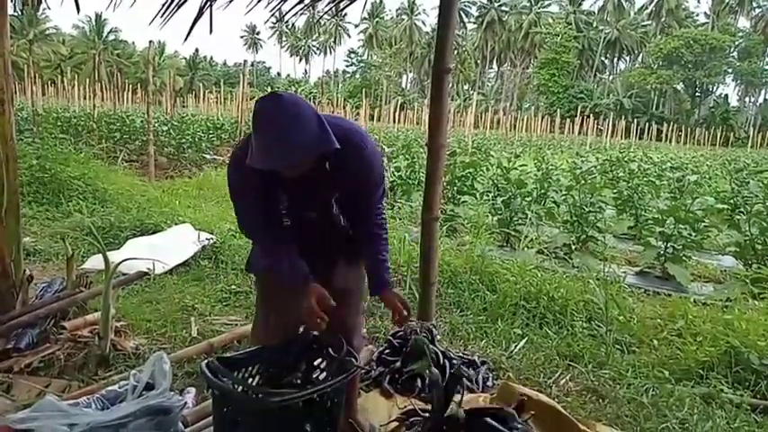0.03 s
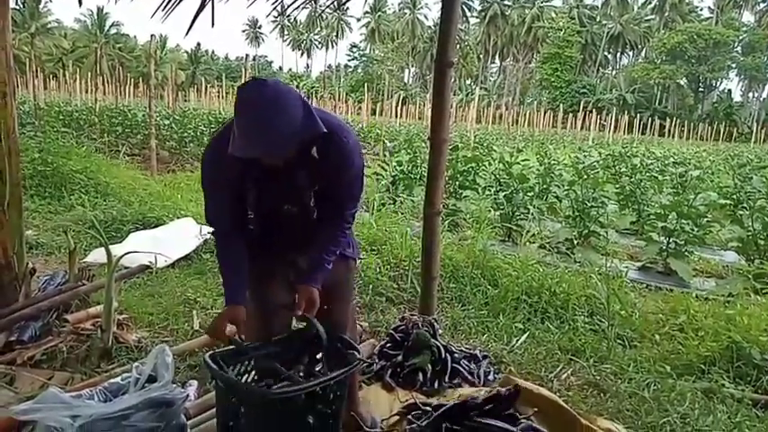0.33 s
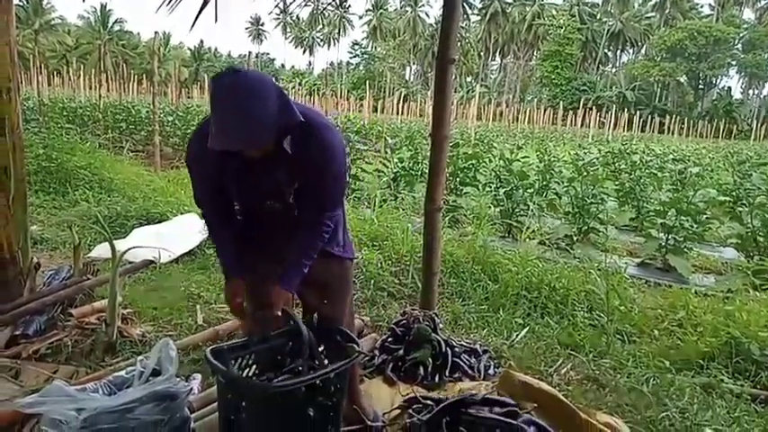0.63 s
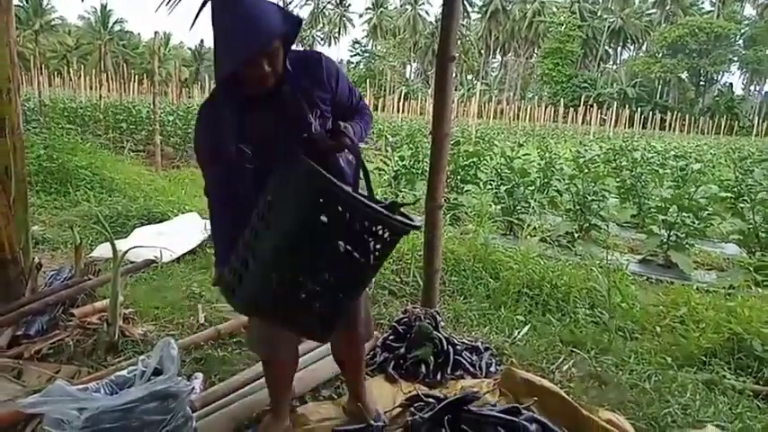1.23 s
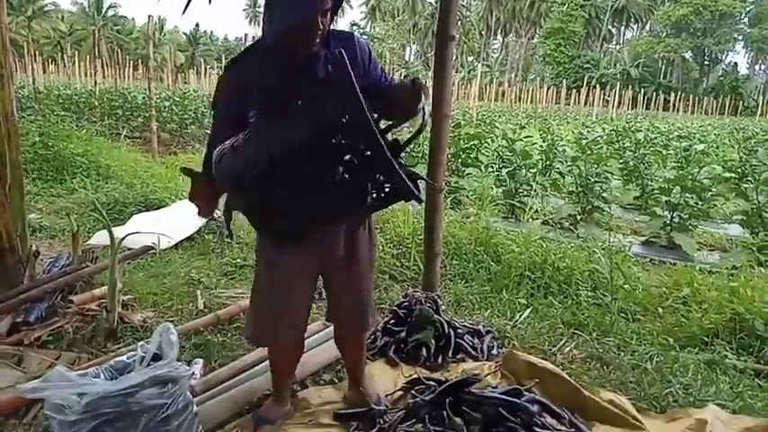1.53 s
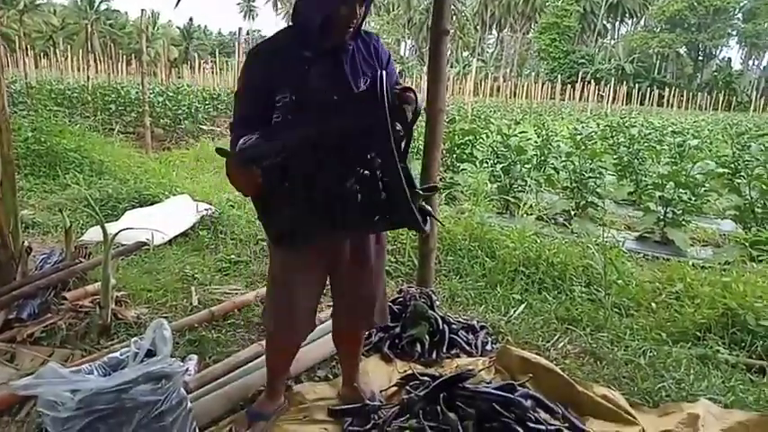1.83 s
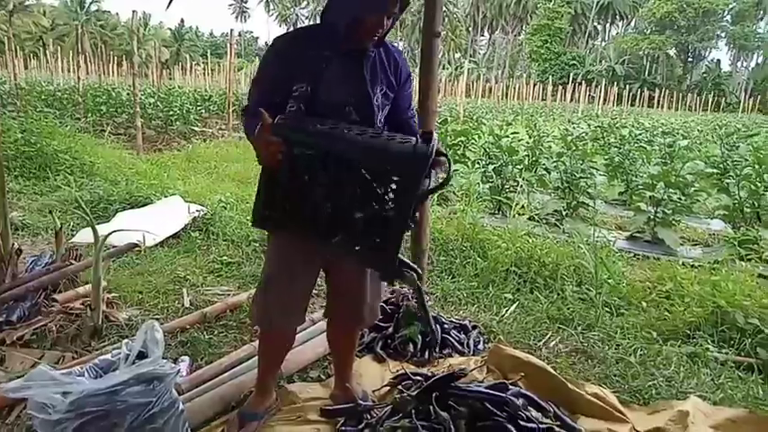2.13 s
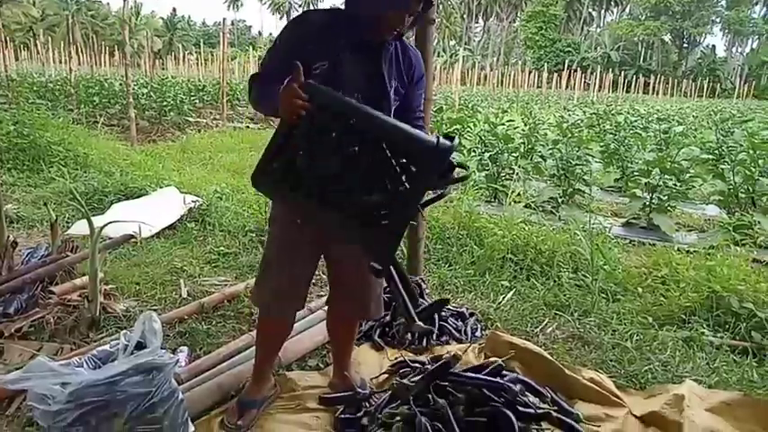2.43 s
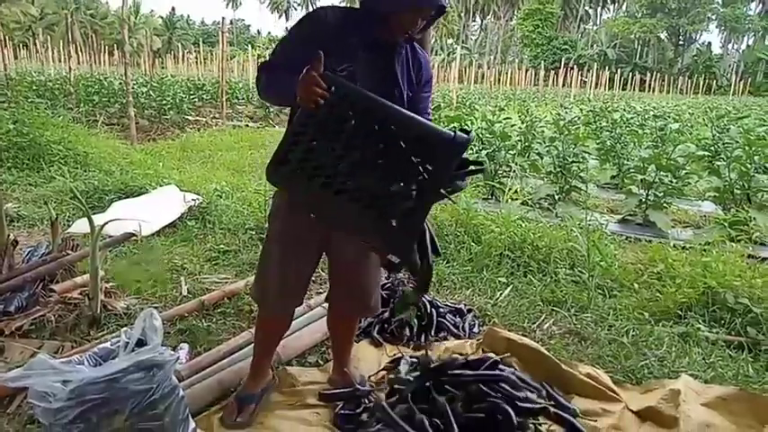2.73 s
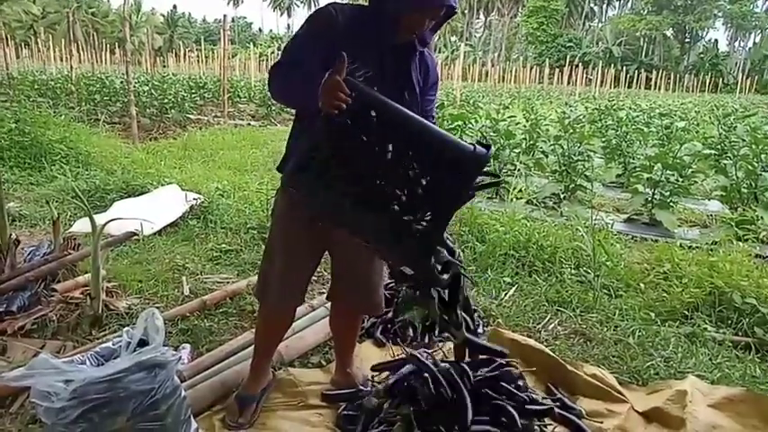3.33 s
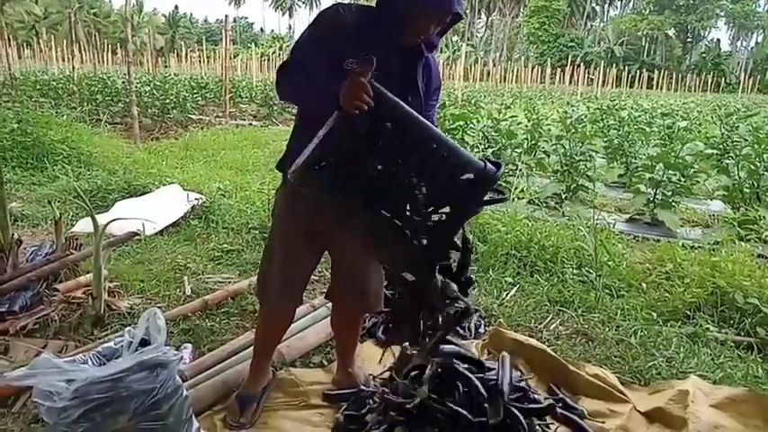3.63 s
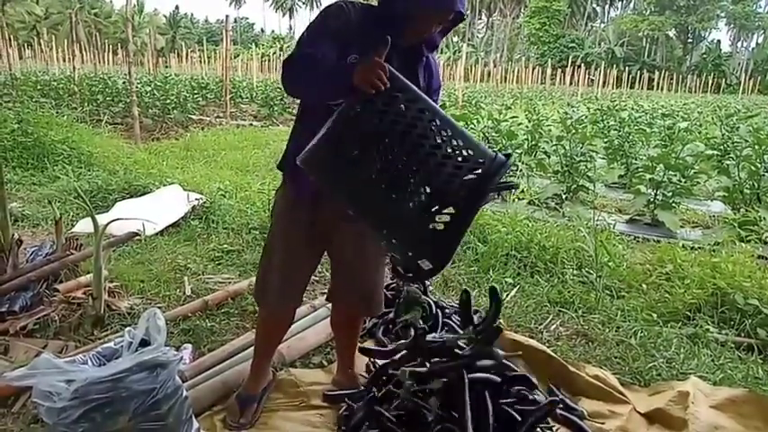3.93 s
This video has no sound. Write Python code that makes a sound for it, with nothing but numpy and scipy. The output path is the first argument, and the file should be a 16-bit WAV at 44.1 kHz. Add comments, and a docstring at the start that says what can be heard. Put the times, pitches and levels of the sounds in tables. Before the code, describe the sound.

Eggplants knock and rustle into a plastic crate during the first second, close and slightly muffled. At about 1.2 seconds the crate is lifted with a thump and a tiny handle squeak, and the load knocks again near 1.6. From 2.3 seconds the vegetables slide, bump and thud onto a pile, busiest from 3 to 4 seconds. Faint bird whistles come and go over a low outdoor rumble.

```python
"""Eggplants rustle, thud and knock in a plastic crate, close to the microphone at the edge of a field.
The crate is loaded, hoisted with a squeak of its handle and tipped out onto a pile: the fruit sets
its walls ringing, slides and jostles over the rim and lands with soft thuds.
Low outdoor rumble lies behind it, with faint bird whistles far off.
One microphone, dull above 4 kHz."""
import sys
import numpy as np
from scipy import signal
from scipy.fft import rfft, irfft, next_fast_len
from scipy.io import wavfile

SR = 44100
rng = np.random.default_rng(int(sys.argv[2]) if len(sys.argv) > 2 else 0)


def unload_wav(signal):
    """Save mono or channel-first audio to the path in sys.argv[1] as 16-bit WAV at rate SR, clipped to [-1, 1]."""
    wavfile.write(
        sys.argv[1],
        SR,
        np.round(np.clip(np.atleast_2d(signal).T, -1, 1) * 32767).astype(np.int16),
    )


N = 176400
TIME, HIT_TIME = np.arange(N) / SR, np.arange(SR // 4) / SR
LIFT_S = 1.0   # the crate leaves the ground


def from_db(db):
    return 10 ** (np.asarray(db) / 20)


def unit_rms(x):
    return x / np.sqrt(np.mean(x ** 2) + 1e-20)


def onset_rms(x):
    """Rms over the first 10 ms of a hit."""
    return np.sqrt(np.mean(x[:SR // 100] ** 2) + 1e-20)


def unit_onset(x):
    return x / onset_rms(x)


def fade(t60):
    """Exponential decay of a hit, 60 dB down after t60 seconds."""
    return np.exp(-np.log(1000) * HIT_TIME / t60)


def swell(length_s):
    """Time axis and a rounded rise, hold and fall."""
    t = np.arange(int(length_s * SR)) / SR
    return t, signal.windows.tukey(len(t), .5)


def add(out, s, sound):
    """Mix a sound in at s seconds."""
    start = max(int(s * SR), 0)
    out[start:start + len(sound)] += sound[:max(N - start, 0)]


def low_cut(x, hz):
    return signal.sosfilt(signal.butter(2, hz, "high", fs=SR, output="sos"), x)


def drift(hz):
    """Random movement slower than about hz, rms 1."""
    smoothing = signal.butter(2, hz, fs=SR, output="sos")
    return unit_rms(signal.sosfilt(smoothing, rng.standard_normal(N + SR))[SR:])


def shaped(x, spectrum):
    """Filter by a curve of (frequency [Hz], gain [dB])."""
    hz, db = np.transpose(spectrum)
    size = next_fast_len(N + SR // 10)
    bins = np.arange(size // 2 + 1) * SR / size
    gain = from_db(np.interp(np.log(bins + 1), np.log(hz), db))
    return irfft(rfft(x, size) * gain, size)[..., :N]


def coloured_noise(spectrum):
    return unit_rms(shaped(rng.standard_normal(N), spectrum))


def field_rumble(level_db=-49.5):
    """The steady, low background of the open field."""
    # outdoor air: (frequency [Hz], relative density [dB])
    air_spectrum = [(25, -29), (45, -17), (70, 0.5), (125, 3), (200, -5.5), (400, -21), (750, -14.5),
                    (3200, -17.5), (4500, -19.5), (7000, -34)]
    return from_db(level_db) * coloured_noise(air_spectrum)


def distant_birds(glide_share=0.13, flutter_hz=60.4, waver_depth_hz=55.4):
    """Thin whistles, far off, that glide to their pitch and flutter."""
    # falling calls and higher rising ones:
    # (time [s], length [s], level [dB], first pitch [Hz], last pitch [Hz])
    bird_calls = [(0, 0.58, -55, 3324, 3136), (0.347, .15, -59, 4200, 5230), (0.845, .19, -59, 4200, 5350),
                  (2.082, 0.143, -59, 2950, 2800), (2.48, .54, -53.5, 3373, 3183)]
    out = np.zeros(N)
    for s, length_s, db, first_hz, last_hz in bird_calls:
        t, envelope = swell(length_s)
        flutter, waver = drift(flutter_hz)[:len(t)], drift(flutter_hz)[:len(t)]
        glide = (first_hz - last_hz) * np.exp(-t / (glide_share * length_s))
        pitch = last_hz + glide + waver_depth_hz * waver
        whistle = np.sin(2 * np.pi * np.cumsum(pitch) / SR)
        add(out, s, from_db(db) * envelope * (1 + .5 * flutter) * whistle)
    return out


def crate_ring(grounded, scatter_db=3.5, detune_spread=.012):
    """Bass, middle and treble ring of the crate; each contact point weights and detunes the modes anew."""
    # the loaded crate, off the ground: (frequency [Hz], relative level [dB], t60 [s])
    crate_modes = [(199.8, -2.5, 0.052), (318.5, 0, 0.051), (420, -6.5, 0.022), (564, -9.5, 0.086),
                   (642, -2.5, 0.053), (734.4, 0.5, 0.045), (826, -5.5, .03), (1109, -4.5, 0.02),
                   (1310, -1, 0.022), (1616, -7.5, 0.012), (1884, -2, 0.017), (2180, -5, 0.009),
                   (2527, -3.5, 0.018), (2900, -5, 0.0097)]
    hz, db, t60 = np.transpose(crate_modes)
    register = np.searchsorted((500, 1000), hz)   # register edges in Hz
    if grounded:
        db = db - 9 * (hz < 700)   # the ground mutes the low modes of the base
        hz = hz * 1.095   # and stiffens the crate
    weight, detune = rng.standard_normal((2, len(hz)))
    gain = from_db(db + scatter_db * weight) * rng.choice([-1, 1], len(hz))
    pitch = hz * (1 + detune_spread * detune)
    modes = gain[:, None] * fade(t60[:, None]) * np.sin(2 * np.pi * pitch[:, None] * HIT_TIME)
    return [modes[register == k].sum(axis=0) for k in range(3)]


def jostling(per_s=80, spot_count=12, registers_db=(-7.5, -2, -9)):
    """Many small bumps ring the crate at scattered spots; rms 1."""
    def spot_ring(grounded):
        return sum(from_db(db) * unit_onset(ring) for ring, db in zip(crate_ring(grounded), registers_db))

    on_ground = [spot_ring(grounded=True) for _ in range(spot_count)]
    lifted = [spot_ring(grounded=False) for _ in range(spot_count)]
    sizes = from_db(-0.5 * np.minimum(rng.exponential(1, N), 3)) * rng.choice([-1, 1], N)
    spot = rng.integers(0, spot_count, N)
    out = np.zeros(N)
    for i in np.flatnonzero(rng.random(N) < per_s / SR):
        rings = on_ground if TIME[i] < LIFT_S else lifted
        add(out, TIME[i], sizes[i] * rings[spot[i]])
    return unit_rms(out)


def sliding_load(jostle_gain_db=1, rub_gain_db=2, flicker_db=4, flicker_hz=16.5):
    """The shifting fruit jostles while its skins rub unevenly on the plastic."""
    # how hard the load slides: (time [s], level [dB])
    slide_levels = [(0, -49), (0.12, -44.5), (0.33, -62), (0.7, -53.5), (0.85, -80), (1.12, -63),
                    (1.28, -51), (1.61, -62), (1.68, -44), (1.82, -54.5), (2.21, -51.5), (2.33, -44),
                    (2.5, -49), (2.85, -43.5), (3.0, -36.5), (3.17, -41.5), (3.225, -43.5), (3.37, -36.5),
                    (3.49, -42), (3.54, -36.5), (3.64, -44), (3.82, -39)]
    # skin on plastic: (frequency [Hz], relative density [dB])
    rub_spectrum = [(60, -14.5), (120, 2.5), (250, 0.5), (450, -10), (740, -1), (1000, -2), (1700, -9.5),
                    (2800, -11.5), (4000, -18.5), (12000, -17.5)]
    rub = from_db(rub_gain_db + flicker_db * drift(flicker_hz)) * coloured_noise(rub_spectrum)
    level = from_db(np.interp(TIME, *np.transpose(slide_levels)))
    return level * (from_db(jostle_gain_db) * jostling() + rub)


def rustles(crinkles_per_s=1500):
    """Stalks, crate and tarp give runs of tiny, bright crinkles."""
    # crisp rustles: (time [s], length [s], level [dB])
    rustle_runs = [(0.02, 0.054, -36.5), (0.08, 0.093, -42.5), (2.542, 0.017, -41), (2.808, 1.7, -42)]
    crinkles = (rng.random(N) < crinkles_per_s / SR) * rng.standard_normal(N)
    level = np.zeros(N)
    for s, length_s, db in rustle_runs:
        add(level, s, from_db(db) * swell(length_s)[1])
    return level * unit_rms(low_cut(crinkles, hz=4200))


def thuds(attack_s=0.001, t60_s=0.076, overtone_db=-10):
    """Soft flesh lands with a few low, heavily damped cycles."""
    # eggplants landing on the pile: (time [s], level [dB], pitch [Hz])
    landings = [(0.031, -31.5, 161.6), (0.102, -30.5, 250), (0.629, -41, 194), (2.278, -36, 246),
                (2.662, -38, 205), (2.745, -33, 145), (2.975, -35.5, 218), (3.075, -35, 216),
                (3.171, -35, 204), (3.251, -33.5, 209), (3.271, -31, 142), (3.422, -33.5, 239),
                (3.78, -31.5, 305), (3.828, -28.5, 164)]
    envelope = fade(t60_s) * (1 - np.exp(-HIT_TIME / attack_s))
    out = np.zeros(N)
    for s, db, hz in landings:
        phase = 2 * np.pi * hz * HIT_TIME
        overtone_ratio = 1.347 * rng.uniform(0.85, 1.6)
        body = np.sin(phase) + from_db(overtone_db) * np.sin(phase * overtone_ratio)
        add(out, s, from_db(db) * unit_onset(body * envelope))
    return out


def rattled_click():
    """A click, then the rattle of neighbouring fruit and faint scattering from shelter and ground."""
    rattle = from_db(-28) * fade(t60=0.079)
    scattering = from_db(-37.5) * fade(t60=0.2)
    drive = rng.standard_normal(len(HIT_TIME)) * (rattle + scattering)
    drive[0] = 1
    return drive


def crate_knocks(graze_s=.007, graze_db=-27, crack_vs_treble_db=-4.5):
    """Fruit grazes the wall, then hits it: the crate rings and the plastic gives a bright crack."""
    # hits on the crate: (time [s], bass [dB], middle [dB], treble [dB])
    wall_hits = [(0.071, -40.5, -37, -59), (0.099, -43.5, -38.5, -43.5), (0.53, -67, -45.5, -36.5),
                 (0.542, -84, -36, -32), (0.55, -60, -29, -28), (0.563, -62, -33.5, -40.5),
                 (0.657, -50, -39.5, -42.5), (0.666, -45, -38.5, -40.5), (0.71, -53, -37.5, -39.5),
                 (1.175, -27.5, -31.5, -40), (1.18, -24.5, -20.5, -32), (1.21, -47.5, -56, -39.5),
                 (1.33, -59, -38.5, -49), (1.422, -57, -43.5, -44), (1.642, -35, -22.5, -36),
                 (1.648, -33.5, -28, -23), (1.662, -55, -30.5, -33.5), (1.735, -56, -43.5, -39),
                 (1.852, -63.5, -37, -43.5), (1.961, -60, -31.5, -44.5), (1.988, -62, -34, -40.5),
                 (2.124, -64, -39, -40.5), (2.274, -44.5, -34.5, -40), (2.716, -47.5, -45, -38),
                 (3.017, -38, -31, -31.5), (3.024, -39, -37.5, -22), (3.029, -48, -28.5, -24),
                 (3.104, -39, -30, -37.5), (3.124, -51.5, -31.5, -14.5), (3.359, -36.5, -31, -32),
                 (3.379, -36.5, -34.5, -33.5), (3.675, -34.5, -25.5, -28.5), (3.68, -38, -42, -29),
                 (3.753, -37, -24, -24.5), (3.93, -34, -29.5, -37.5)]
    graze_rise = from_db(graze_db) * np.linspace(0, 1, int(graze_s * SR))
    out = np.zeros(N)
    for s, *levels_db in wall_hits:
        crack_noise, graze_noise = rng.standard_normal((2, len(HIT_TIME)))
        graze = graze_rise * graze_noise[:len(graze_rise)]
        drive = rattled_click()
        rings = crate_ring(grounded=s < LIFT_S)
        for register, (ring, db) in enumerate(zip(rings, levels_db)):
            lead_in = graze * (register < 2)   # too soft to stir the treble
            knock = signal.fftconvolve(np.r_[lead_in, drive], ring)[:len(drive)]
            add(out, s - graze_s, from_db(db) * knock / onset_rms(knock[len(graze):]))
        crack = low_cut(crack_noise * fade(t60=0.1), hz=2470)
        add(out, s, from_db(levels_db[-1] + crack_vs_treble_db) * unit_onset(crack))
    return out


def hollow_bumps():
    """Firm fruit meets fruit with a short, round knock, each at its own pitch."""
    # eggplant against eggplant: (time [s], level [dB], pitch [Hz])
    fruit_hits = [(0.378, -42, 788), (1.552, -39.5, 690), (2.362, -37, 666), (2.549, -39, 768),
                  (2.593, -40, 708), (2.784, -35, 655), (2.875, -33.5, 700), (2.962, -32, 773),
                  (2.993, -29.5, 727), (3.071, -33.5, 704), (3.295, -36, 815), (3.467, -37.5, 970),
                  (3.566, -32.5, 793), (3.659, -32, 560)]
    # ring of one fruit: (multiple of its pitch [ratio], relative level [dB], t60 [s])
    fruit_modes = [(.84, -13, 0.064), (1, 2, 0.046), (1.75, -5.5, .02)]
    out = np.zeros(N)
    for s, db, hz in fruit_hits:
        ring = sum(from_db(mode_db) * fade(t60) * np.sin(2 * np.pi * hz * multiple * HIT_TIME)
                   for multiple, mode_db, t60 in fruit_modes)
        bump = signal.fftconvolve(rattled_click(), ring)[:len(ring)]
        add(out, s, from_db(db) * unit_onset(bump))
    return out


def handle_squeak(at_s=1.171, pitch_hz=2610, level_db=-33):
    """The plastic handle slips and sings briefly as it takes the weight."""
    out = np.zeros(N)
    t, envelope = swell(length_s=.016)
    add(out, at_s, from_db(level_db) * envelope * np.sin(2 * np.pi * pitch_hz * t))
    return out


def scene():
    """Crate and fruit up close, the field behind them, in mono."""
    handling = crate_knocks() + thuds() + hollow_bumps() + sliding_load() + handle_squeak() + rustles()
    return (low_cut(handling, hz=85) + field_rumble() + distant_birds())[None]


def record(dry, hiss_db=-84.5, cutoff_hz=15500):
    """A dull microphone: the treble drops steeply to a faint shelf with a little hiss; the top is cut."""
    # microphone response: (frequency [Hz], gain [dB])
    mic_response = [(3700, 0), (4400, -11.5), (5000, -21.5), (5500, -32), (6500, -39.5), (8000, -53.5),
                    (11800, -41), (15000, -48)]
    heard = shaped(dry, mic_response) + from_db(hiss_db) * rng.standard_normal(dry.shape)
    return signal.sosfilt(signal.ellip(10, .1, 80, cutoff_hz, fs=SR, output="sos"), heard)


dry = scene()
out = record(dry)
unload_wav(out)
```